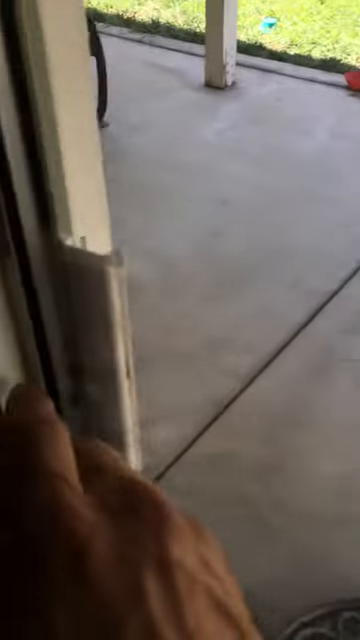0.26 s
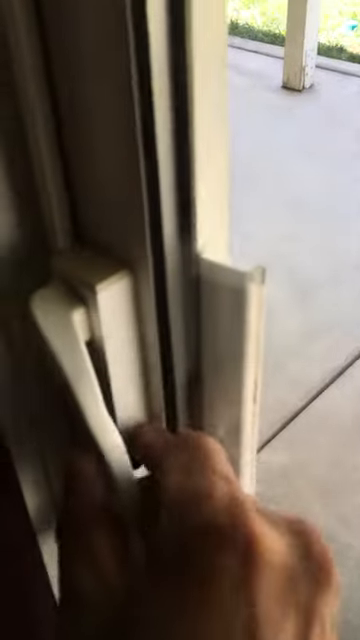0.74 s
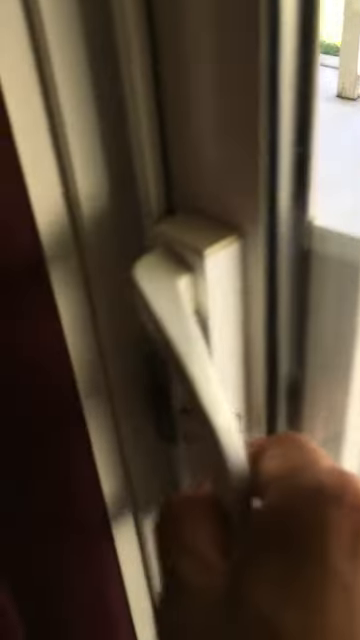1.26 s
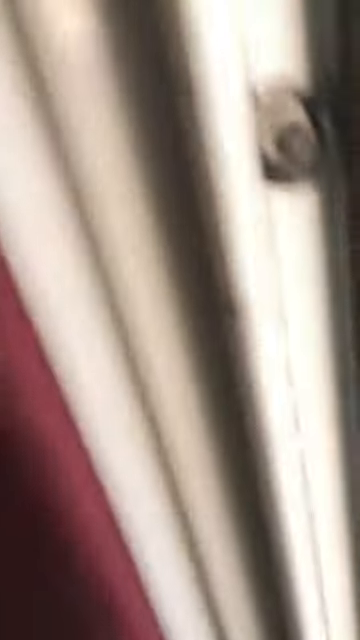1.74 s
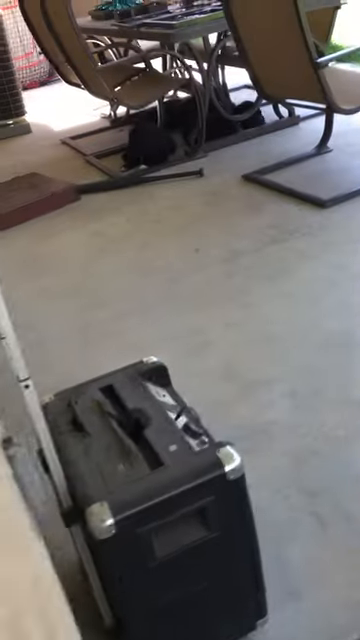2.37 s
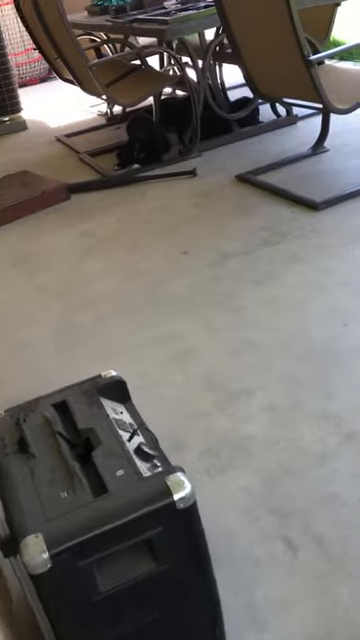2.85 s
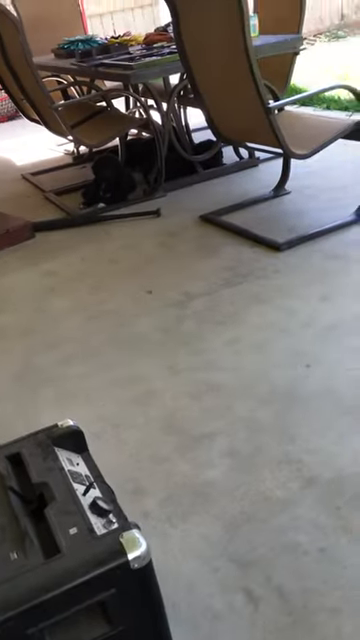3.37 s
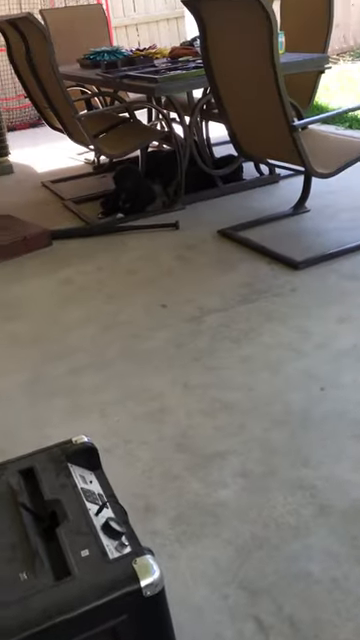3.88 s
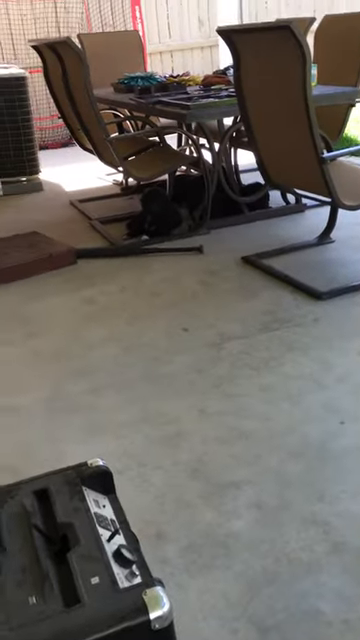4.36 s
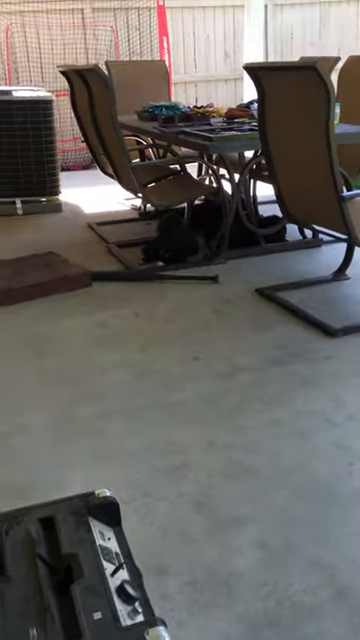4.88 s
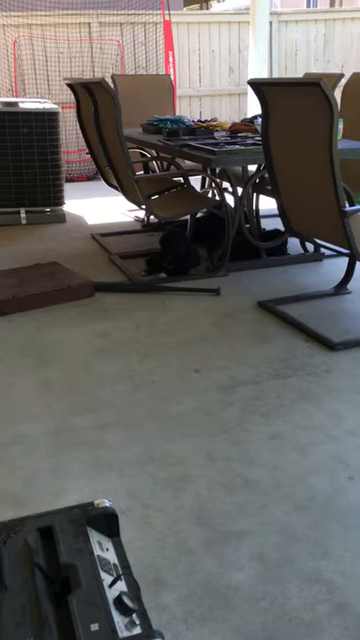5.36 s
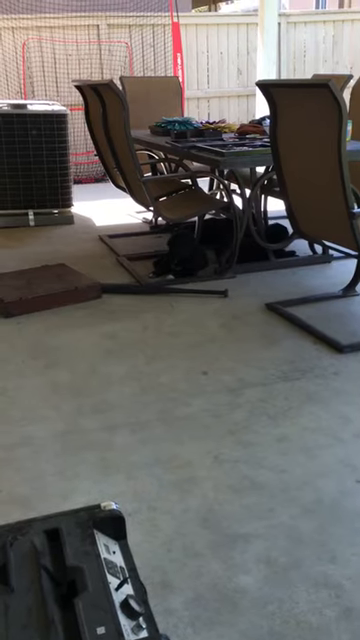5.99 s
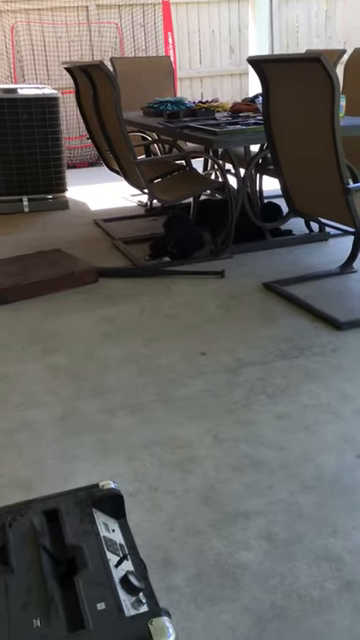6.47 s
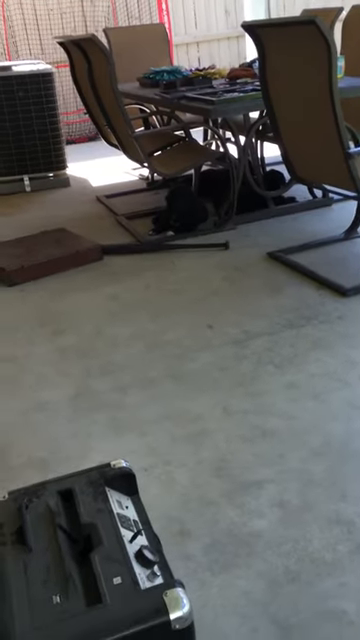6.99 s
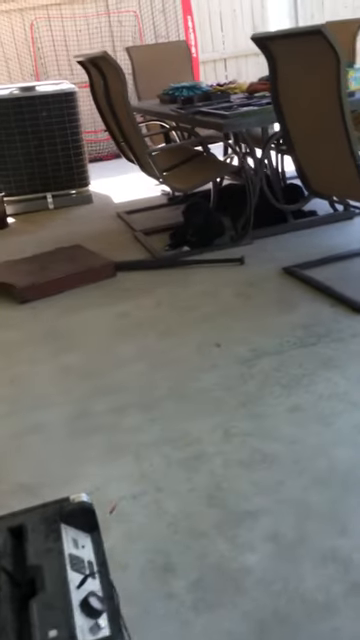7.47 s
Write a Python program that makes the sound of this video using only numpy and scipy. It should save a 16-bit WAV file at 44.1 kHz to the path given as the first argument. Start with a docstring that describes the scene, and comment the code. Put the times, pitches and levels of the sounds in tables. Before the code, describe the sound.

Sharp metal latch clicks, then a glass door rumbles and hisses open onto the low hum and whir of an air conditioner.

```python
"""Opening a sliding patio door

In a quiet room a hand works the latch: metal clicks, creaks and rubs, and the door thuds.
The door slides open on rumbling rollers while its brush seal hisses and its glass sings.
The yard comes in: an air conditioner's fan rush, its compressor whine and a low hum near 95 Hz
that swells, fades and sinks a little in pitch. A thin hiss falls, and a dull tap comes near the end."""
import sys
import numpy as np
from scipy import signal
from scipy.fft import rfft, irfft, next_fast_len
from scipy.io import wavfile

SR = 44100
rng = np.random.default_rng(int(sys.argv[2]) if len(sys.argv) > 2 else 0)


def pcm_store(signal):
    """Save signal as 16-bit PCM."""
    levels = np.round(np.clip(np.atleast_2d(signal), -1, 1) * 32767)
    wavfile.write(sys.argv[1], SR, levels.astype(np.int16).T)


N = 341025
TIME = np.arange(N) / SR

# indoor noise, from bass to treble: f/Hz, level/dB
ROOM_SPECTRUM = [(15, -47.5), (25, -20.5), (60, 1.5), (80, -3.5), (97, 4), (125, -16), (200, -6.5),
                 (290, -3), (350, -15.5), (510, -20), (620, -27), (1250, -30), (1800, -33), (4870, -35.5),
                 (12500, -40), (16000, -46)]
# faint steady tones indoors: f/Hz, level/dB
ROOM_TONES = [(290.7, -69), (511.4, -77.5), (866.7, -82), (1260, -82.5)]
# air conditioner, faint until the door opens: t/s, rumble level/dB, fan level/dB
AIR_LEVELS = [(0, -62, -78.5), (1.3, -54, -63.5), (1.6, -42.5, -79), (2.2, -44, -68), (2.75, -43, -54),
              (5.6, -42.5, -56), (6.3, -40, -55), (6.8, -42.5, -54.5), (7.73, -42.5, -54.5)]
# rumble of its swirling air: f/Hz, level/dB
RUMBLE_SPECTRUM = [(15, -51), (25, -27), (43, -10.5), (56, 2.5), (70, -4.5), (82, 1), (108, -6), (135, 2),
                   (150, -9.5), (170, -9), (220, -18.5), (290, -17), (330, -25), (450, -57)]
# rush of its fan: f/Hz, level/dB
FAN_SPECTRUM = [(190, -35), (350, -7.5), (450, -4.5), (720, -6.5), (1100, -8.5), (1800, -15), (2100, -12.5),
                (2850, -19), (3500, -17), (4950, -23.5), (5800, -21.5), (7800, -28), (9500, -29.5),
                (10500, -36), (11400, -32), (12800, -36), (14300, -34.5), (16000, -42)]
# compressor tones: multiples of the shaft's turning rate
WHINE_MULTIPLES = [6, 7, 8, 10, 12, 15, 16, 17, 18, 20, 22, 24, 27, 29, 33, 34, 35, 42, 43, 44, 45, 48, 50,
                   56, 59, 60, 67, 70]
# each of those tones with the door open: level/dB
WHINE_LEVELS = [-68.5, -72, -77.5, -68.5, -69, -73, -77.5, -83, -72, -73, -76, -84, -75.5, -84.5, -83, -78,
                -78.5, -80, -82, -84.5, -78, -85, -92, -88.5, -84.5, -78, -84, -83]
# latch, handle and track clicks: t/s, peak level/dB, f/Hz, fade time/s, frame knock level/dB
CLICKS = [(0.388, -43.5, 6800, 0.0046, -52), (0.406, -47, 7600, 0.0045, -47.5),
          (.574, -53, 2200, .006, -62), (0.622, -38.5, 8140, 0.0037, -50), (0.7026, -50, 8900, 0.0044, -58),
          (0.826, -40, 8600, 0.0059, -44), (0.836, -36, 7100, .006, -41), (0.8477, -37, 2080, .012, -28),
          (0.854, -21.5, 5860, 0.0099, -27), (0.867, -37, 5600, 0.0072, -29),
          (0.8772, -16.5, 5530, 0.0089, -48), (0.878, -19, 4000, 0.029, -24.5),
          (0.883, -11.5, 6350, 0.0064, -22.5), (0.885, -9, 6320, 0.01, -31), (0.893, -24, 3930, .015, -23),
          (1.084, -43, 9000, 0.008, -58), (1.106, -37.5, 12500, 0.011, -57),
          (1.1204, -42, 3200, 0.0075, -40), (1.212, -49, 7500, 0.002, -72), (1.23, -47, 8000, .002, -62),
          (1.258, -45, 13000, .004, -74), (1.282, -34.5, 1660, .005, -59), (1.283, -40, 7040, 0.0061, -68),
          (1.308, -40, 2020, 0.008, -46), (1.3195, -28, 12900, .003, -62), (1.3473, -24, 14600, .002, -62),
          (1.3485, -29, 2220, 0.0048, -54), (1.349, -28, 4330, 0.0034, -46), (1.353, -36, 8800, 0.013, -60),
          (1.825, -49, 5000, .008, -57), (2.623, -40, 3000, .008, -33), (2.718, -45, 4000, .006, -60)]
# notes the latch metal rings at: f/Hz, level/dB, fade time/s
LATCH_NOTES = [(3840, 6, 0.029), (4330, -2, 0.025), (5500, -10, .016), (6400, -4, 0.017),
               (8340, -1, 0.0095), (11600, -2, 0.011), (14000, 6, .01), (1930, -6, .02)]
# creaks of parts that stick and slip: t/s, length/s, slip rate/Hz, level/dB, f/Hz
CREAKS = [(0.588, .006, 1800, -51, 6200), (0.594, 0.022, 1300, -42, 5950), (0.661, 0.028, 530, -50, 6200),
          (0.783, .02, 690, -55, 6300), (0.782, 0.031, 1100, -51.5, 2500), (0.844, 0.015, 1800, -32, 5500),
          (0.862, 0.031, 1300, -25, 5360), (1.107, 0.011, 1300, -34, 6100),
          (1.312, 0.031, 450, -20.5, 4400)]
# thuds in the door panel: t/s, level/dB, f/Hz, fade time/s
THUDS = [(0.389, -37, 200, 0.016), (.408, -42, 179, 0.037), (.714, -53, 150, .05), (.845, -32.5, 77, 0.12),
         (.884, -34, 68.6, 0.12), (1.127, -31, 175, 0.096), (1.35, -35, 89, 0.27)]
# scuffing of hand and seal: t/s, level/dB
SCUFF_LEVELS = [(.78, -74), (.83, -48), (.89, -42.5), (.95, -63), (1.05, -85), (1.19, -69), (1.21, -58),
                (1.3, -64), (1.36, -60), (1.42, -62), (1.83, -67)]
# its bright tone: f/Hz, level/dB
SCUFF_SPECTRUM = [(3000, -16), (5500, 8), (8500, 3), (10500, 0), (13500, -2), (16000, -8)]
# notes of the rubbed metal: f/Hz, width/Hz, level/dB
RUB_NOTES = [(3240, 60, -29), (4000, 65, -10), (4180, 80, 0), (4260, 80, 3), (4530, 110, 5),
             (5320, 91, 2.5), (6450, 200, -1.5), (8100, 200, -32)]
# metal rubbing in the frame as the door rolls: t/s, level/dB
RUB_LEVELS = [(1.43, -61), (1.5, -58.5), (1.7, -51.5), (1.85, -55), (1.95, -49), (2.2, -50), (2.3, -59)]
# door on its track: t/s, roller level/dB, seal level/dB
SLIDE_LEVELS = [(1.37, -48.5, -51), (1.45, -39.5, -59), (1.6, -36.5, -51.5), (1.79, -34, -47),
                (1.85, -39.5, -40), (2.2, -45, -38.5), (2.38, -48, -40), (2.46, -49, -43.5),
                (2.65, -48.5, -47.5), (2.75, -55, -57), (2.9, -59, -59)]
# roller rumble: f/Hz, level/dB
ROLLER_SPECTRUM = [(24, -39), (40, -28), (70, 7.5), (162, -8), (200, 2), (278, -4.5), (406, -9), (467, -8),
                   (518, -17), (595, -6), (745, -14.5), (812, -15.5), (2500, -34), (3250, -79),
                   (5500, -120)]
# brush seal hiss: f/Hz, level/dB
SEAL_SPECTRUM = [(180, -31), (300, -7.5), (550, -1), (750, -4.5), (1040, 1), (1500, -5), (1860, -3.5),
                 (2500, -7.5), (3400, -9), (4110, -8.5), (4900, -11.5), (8900, -13.5), (10500, -19.5),
                 (12200, -18.5), (16000, -26.5)]
# singing glass: t/s, level/dB
GLASS_LEVELS = [(1.4, -60), (1.47, -47), (1.75, -48), (1.86, -40), (2.12, -52.5), (2.2, -45), (2.4, -58),
                (2.6, -45.5), (2.67, -61)]
# the hum's three lowest tones: t/s, first level/dB, second level/dB, third level/dB
HUM_LEVELS = [(1.8, -51, -60, -58), (2.0, -39.5, -61, -55), (2.35, -38.5, -47, -67), (2.75, -35, -53, -56),
              (3.3, -35.5, -62, -54), (3.65, -41, -60, -65.5), (4.0, -35, -54, -62),
              (4.3, -31, -42.5, -61.5), (4.55, -28, -38, -59), (5.1, -25.5, -42.5, -51),
              (5.6, -25, -44, -57.5), (5.8, -26.5, -49.5, -57), (6.05, -27, -42.5, -60.5),
              (6.25, -32.5, -63, -61.5), (6.55, -31.5, -61, -55), (6.85, -33, -59, -60),
              (7.12, -36.5, -44.5, -60), (7.73, -38.5, -38.5, -54.5)]
# its sinking pitch: t/s, f/Hz
HUM_PITCH = [(1.8, 95.9), (3.75, 95.9), (4.25, 95.3), (4.75, 95.0), (5.25, 94.7), (6.25, 94.4),
             (7.73, 93.9)]
# brief dips in its lowest tone: t/s, depth/dB
HUM_DIPS = [(2.77, 5), (2.91, 7), (3.07, 2), (3.5, 4), (3.68, 4), (4.25, 2.5), (4.79, 1), (5.27, 4.5),
            (5.56, 8), (5.93, 3)]
# thin falling hiss: t/s, f/Hz, level/dB
HISS_PATH = [(2.9, 15600, -71), (2.95, 14700, -68), (3.02, 14300, -64), (3.08, 13600, -63),
             (3.12, 12400, -62), (3.15, 10700, -61), (3.18, 8320, -61), (3.205, 5800, -59),
             (3.22, 4500, -64)]


def amp(db):
    """Turn decibels into a number to multiply by."""
    return 10 ** (np.asarray(db) / 20)


def rms_one(x):
    """Scale a sound so its average strength (rms) is one."""
    return x / np.sqrt(np.mean(x ** 2) + 1e-20)


def in_time(rows):
    """Join a table's points with straight lines: one curve for each column after the time."""
    s, *columns = np.transpose(rows)
    return [np.interp(TIME, s, c) for c in columns]


def span(rows, fade_s=0.03):
    """One from a table's first time to its last, fading to zero outside."""
    return np.clip(np.minimum(TIME - rows[0][0], rows[-1][0] - TIME) / fade_s + 1, 0, 1)


def drift(hz):
    """A random wobble of typical size one; more hz makes it faster."""
    r = np.exp(-80 * np.pi * hz / SR)
    slow = signal.lfilter([1], [1, -2 * r, r * r], rng.standard_normal(N // 40 + 2002))[2000:]
    return np.interp(np.arange(N) / 40, np.arange(len(slow)), rms_one(slow))


def shaped_noise(spectrum, flicker_db, grain_db=0.0):
    """Noise with a given balance of bass and treble; each octave can flicker."""
    size = next_fast_len(N)
    white = rng.standard_normal(N) * amp(grain_db * drift(130))
    hz = np.maximum(np.fft.rfftfreq(size, 1 / SR), 1)
    point_hz, point_db = np.transpose(spectrum)
    shaped = rfft(white, size) * amp(np.interp(np.log(hz), np.log(point_hz), point_db, -90, -90))
    out, together = 0, drift(6.6)
    for centre in 2.0 ** np.arange(4, 15):
        share = np.clip(1 - np.abs(np.log2(hz / centre)), 0, 1)  # overlapping octaves add up to one
        if point_hz[0] / 2 < centre < point_hz[-1] * 2:
            octave = irfft(shaped * share, size)[:N]
            out = out + octave * amp(flicker_db * (0.59 * together + drift(17.6)))
    return rms_one(out)


def ring(x, hz, fade_s):
    """Each push in x starts a note that dies away by 60 dB in fade_s."""
    r, w = amp(-60 / (max(fade_s, .001) * SR)), 2 * np.pi * hz / SR
    return signal.lfilter([0, np.sin(w)], [1, -2 * r * np.cos(w), r * r], x + 1e-18)


def add(out, s, sound):
    """Mix a short sound in, starting at s seconds."""
    i = round(s * SR)
    out[i:i + len(sound)] += sound[:N - i]


def room():
    """Soft indoor noise, with faint tones that fade out as the door starts to open."""
    tones = sum(amp(db + 0.71 * drift(5.4)) * np.sin(2 * np.pi * hz * TIME + 0.74 * drift(11.0))
                for hz, db in ROOM_TONES)
    tones += amp(-85 + 4 * drift(30)) * np.sin(2 * np.pi * 2975 * TIME + drift(8))  # thin whine
    noise = amp(-57) * shaped_noise(ROOM_SPECTRUM, flicker_db=0.7)
    return noise + np.sqrt(2) * tones * np.interp(TIME, [.9, 1.5], [1, 0])


def air_conditioner(shaft_hz=59.095, open_fan_db=-54.5):
    """Swirling air rumbles, the fan rushes, and the compressor's whine grows along with the rush."""
    rumble_db, fan_db = in_time(AIR_LEVELS)
    turn = 2 * np.pi * shaft_hz * TIME + 0.03 * drift(0.84)
    starts = rng.uniform(0, 2 * np.pi, len(WHINE_MULTIPLES))
    whine = sum(amp(db + 2.15 * drift(0.78)) * np.sin(k * turn + start)
                for k, db, start in zip(WHINE_MULTIPLES, WHINE_LEVELS, starts))
    rumble = amp(rumble_db + 0.5 * drift(0.65)) * shaped_noise(RUMBLE_SPECTRUM, flicker_db=2.5)
    fan = amp(fan_db + 0.23 * drift(1.0)) * shaped_noise(FAN_SPECTRUM, flicker_db=0.62)
    return rumble + fan + np.sqrt(2) * amp(fan_db - open_fan_db) * whine


def strike(hz, fade_s, chances, noise):
    """One hit on metal: a short crack near one pitch rings the closest latch notes most."""
    age = np.arange(len(noise)) / SR / max(fade_s, .002)
    burst = noise * amp(-60 * age) * np.minimum(age / 0.041, 1)  # longer hits build more slowly
    soften = signal.butter(1, min(2.1 * hz, 18000), fs=SR, output="sos")
    edge = signal.sosfilt(soften, np.diff(burst, prepend=0))
    crack = ring(edge, hz, 3.9 / hz)
    note = ring(crack, hz, 5.4 / hz)
    metal = sum(amp(db + 2.0 * chance - 11.0 * abs(np.log2(f / hz))) * ring(crack, f, ring_s)
                for (f, db, ring_s), chance in zip(LATCH_NOTES, chances))
    sound = 0.46 * rms_one(edge) + 0.087 * rms_one(crack) + rms_one(note) + 0.48 * rms_one(metal)
    return sound / np.max(np.abs(sound))


def clicks(roller_turn_s=.0378):
    """Metal parts click and knock the frame; a roller ticks once a turn as the door starts."""
    out = np.zeros(N)
    ticks = [(1.486 + k * roller_turn_s, -46 + 2.9 * louder, 4420 * (1 + .03 * higher), .008, -59)
             for k, (louder, higher) in enumerate(rng.standard_normal((7, 2)))]
    for s, db, hz, fade_s, knock_db in CLICKS + ticks:
        noise = rng.standard_normal(2600)
        add(out, s, amp(db) * strike(hz, fade_s, rng.standard_normal(len(LATCH_NOTES)), noise))
        shake = noise * amp(-60 * TIME[:2600] / 0.038)
        knock = ring(shake, 480, 0.0056) + 1.45 * ring(shake, 1210, 0.0035)  # two dull frame notes
        add(out, s, amp(knock_db) * knock / np.max(np.abs(knock)))
    return out


def thuds():
    """Jolts from the latch set the door panel ringing low and briefly."""
    out = np.zeros(N)
    for s, db, hz, fade_s in THUDS:
        add(out, s, amp(db) * ring(signal.unit_impulse(9000), hz, fade_s))
    return out


def wall_echo(x, fade_s=0.57, echo_db=-22):
    """Add a short wash of echoes from the room and the door glass."""
    tail = rng.standard_normal(SR // 2) * amp(-60 * TIME[:SR // 2] / fade_s)
    tail = signal.lfilter([1, .9], [1, -.6], tail)  # the walls swallow the treble
    return x + amp(echo_db) * signal.fftconvolve(x, tail / np.sqrt(np.sum(tail ** 2)))[:N]


def creaks():
    """Latch parts stick and slip, making a fast, uneven run of tiny ringing clicks."""
    out = np.zeros(N)
    for s, length, rate, db, hz in CREAKS:
        gaps = rng.normal(1, 120 / rate + rate / 3000, 100)
        sizes_db = rng.normal(0, 1.6, 100)
        at = np.cumsum(np.abs(gaps)) / rate
        on = at < length
        slips = np.zeros(4000)
        slips[(at[on] * SR).astype(int)] = amp(sizes_db[on]) * np.sin(np.pi * (at[on] / length) ** 0.52)
        sound = ring(slips, hz, 3.4 / hz) + .5 * np.diff(slips, prepend=0) + 0.11 * ring(slips, hz, 0.0079)
        add(out, s, amp(db) * sound)
    return out


def scuff():
    """The hand and the seal scuff with a bright, grainy hiss."""
    hiss = shaped_noise(SCUFF_SPECTRUM, flicker_db=3.5, grain_db=1.5)
    return span(SCUFF_LEVELS) * amp(in_time(SCUFF_LEVELS)[0]) * hiss


def metal_rub(clack_s=0.915, fade_db_per_s=67):
    """Many tiny touches keep metal singing, after the latch clacks and while the door rolls."""
    grains = rng.standard_normal(N) * amp(0.94 * drift(230))
    metal = sum(amp(db) * rms_one(ring(grains, hz, 0.69 / width)) for hz, width, db in RUB_NOTES)
    age = TIME - clack_s
    after_clack = np.clip(age / 0.02 + 1, 0, 1) * amp(-45 - fade_db_per_s * np.maximum(age, 0))
    rolling = span(RUB_LEVELS, 0.023) * amp(in_time(RUB_LEVELS)[0] + 4.5 * drift(23))
    return rms_one(metal) * (after_clack + rolling)


def slide():
    """Rollers rumble; the brush seal drags with a grainy hiss that rings the door panel's many notes."""
    rollers_db, seal_db = in_time(SLIDE_LEVELS)
    rollers = amp(rollers_db + drift(16)) * shaped_noise(ROLLER_SPECTRUM, flicker_db=1.0, grain_db=2.0)
    seal = shaped_noise(SEAL_SPECTRUM, flicker_db=0.0, grain_db=1.5)
    pitches = np.geomspace(320, 2600, 22) * rng.normal(1, 0.03, 22)
    panel = sum(amp(3.5 * drift(9.2)) * ring(seal, hz, 0.12) for hz in pitches)
    return span(SLIDE_LEVELS, 0.14) * (rollers + amp(seal_db) * (seal + 0.43 * rms_one(panel)))


def glass():
    """The pane sings one note, shaken unevenly by the rollers."""
    hz = 277 + 2.52 * drift(3.6)
    level = span(GLASS_LEVELS, 0.057) * amp(in_time(GLASS_LEVELS)[0] + 2.3 * drift(10))
    return np.sqrt(2) * level * np.sin(2 * np.pi * np.cumsum(hz) / SR)


def hum(half_dip_s=0.039):
    """A low tone that dips now and then, with three overtones; all four waver slightly."""
    turn = 2 * np.pi * np.cumsum(in_time(HUM_PITCH)[0]) / SR
    first_db, second_db, third_db = in_time(HUM_LEVELS)
    first_db -= sum(db * np.clip(1 - np.abs(TIME - s) / half_dip_s, 0, 1) for s, db in HUM_DIPS)
    levels = [first_db + 0.65 * drift(7.4), second_db + drift(3.1),
              third_db + 1.9 * drift(5.0), -67.5 + 3 * drift(1.6)]
    tones = sum(amp(db + 0.48 * drift(26)) * np.sin(k * (turn + 0.17 * drift(7.3)))
                for k, db in enumerate(levels, 1))
    return np.sqrt(2) * span(HUM_LEVELS, 0.86) * tones


def falling_hiss():
    """Two narrow bands of noise, one just above the other, slide down in pitch."""
    hz, db = in_time(HISS_PATH)
    out = 0
    for ratio, band_db, spread_hz in [(.96, -4, 550), (1.17, -3, 900)]:
        smooth = signal.butter(2, spread_hz, fs=SR, output="sos")
        noise = signal.sosfilt(smooth, rng.standard_normal((2, N)))
        turn = 2 * np.pi * np.cumsum(hz * ratio * (1 + 0.014 * drift(31.3))) / SR
        band = rms_one(noise[0] * np.cos(turn) + noise[1] * np.sin(turn))  # lift it to the pitch
        out = out + amp(band_db + 2.4 * drift(45)) * band
    return span(HISS_PATH) * amp(db) * out


def tap(at_s=7.3305, hz=1600):
    """One soft tap in the yard, and the dull tail that the patio walls send back."""
    out = np.zeros(N)
    tail = 0.015 * rng.standard_normal(6000) * amp(-60 * TIME[:6000] / 0.17)
    push = signal.unit_impulse(6000) + tail
    add(out, at_s, amp(-29) * (ring(push, hz, 0.003) + 0.4 * ring(push, hz / 2, 0.005)))
    return out


def scene():
    """Room, door and yard, mixed into one channel."""
    door = slide() + glass() + metal_rub() + scuff() + wall_echo(clicks() + thuds() + creaks())
    return (room() + hum() + air_conditioner() + door + falling_hiss() + tap())[None]


def record(dry):
    """Cut away the very highest treble."""
    return signal.sosfilt(signal.cheby2(14, 60, 16500, fs=SR, output="sos"), dry)


dry = scene()
out = record(dry)
pcm_store(out)
```